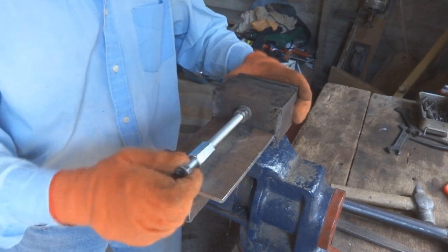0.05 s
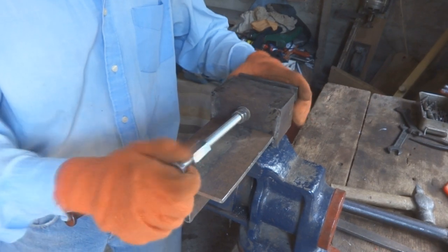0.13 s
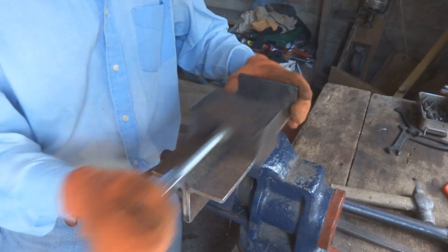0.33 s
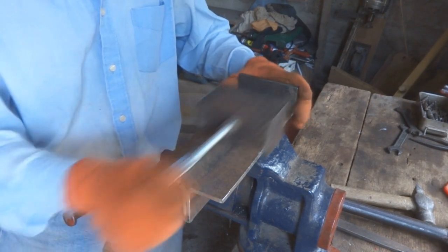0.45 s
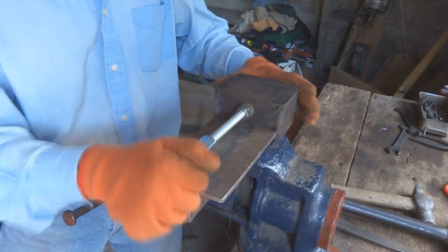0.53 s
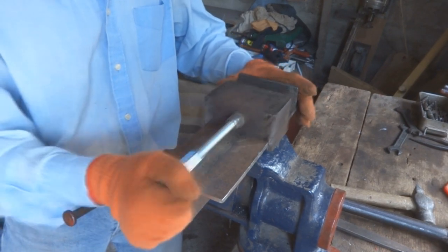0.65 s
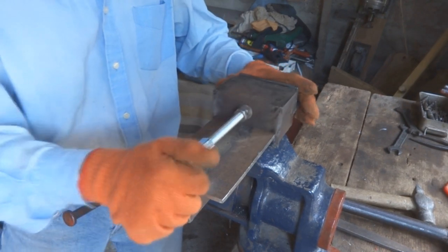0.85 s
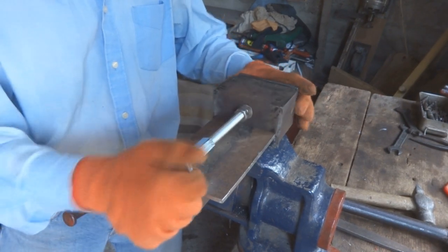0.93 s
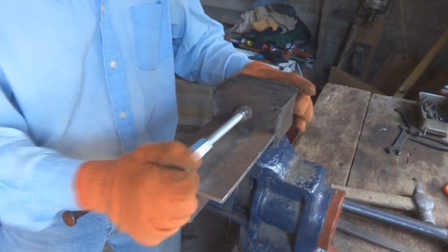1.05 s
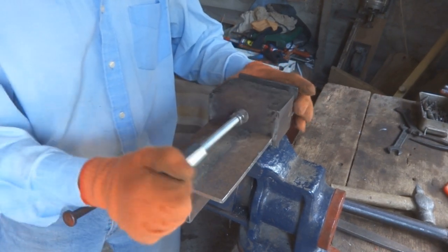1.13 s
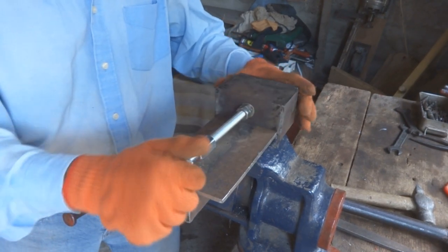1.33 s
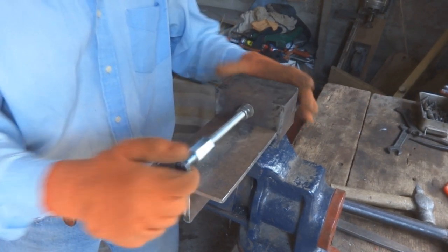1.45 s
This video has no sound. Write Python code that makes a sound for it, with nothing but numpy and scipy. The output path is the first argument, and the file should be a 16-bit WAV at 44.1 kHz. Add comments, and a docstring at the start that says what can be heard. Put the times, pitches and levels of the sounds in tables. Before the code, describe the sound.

A steel hand tool rasps and scrapes as it twists in a metal plate, with clicks.

```python
"""A steel hand tool twists to and fro in a hole in a steel plate, held in a bench vise in a small workshop.
Each twist is a rasp of tiny slips that rings the plate and the tool's shank. The loose tool clicks
in its holder, the bench thumps under the hardest twists, and now and then friction locks on to
one mode of the shank in a brief squeal."""
import sys
import numpy as np
from scipy import signal
from scipy.fft import rfft, irfft, next_fast_len
from scipy.io import wavfile

SR = 44100
rng = np.random.default_rng(int(sys.argv[2]) if len(sys.argv) > 2 else 0)


def transcribe(u):
    """Save the signal u as a 16-bit wav file named by the first command-line argument.

    u: samples, shape (n,) or (channels, n), limited to [-1, 1]; the rate is SR.
    q: integer samples, one column per channel.
    """
    v = np.clip(np.atleast_2d(u).T, -1, 1)
    q = np.round(v * 32767).astype(np.int16)
    wavfile.write(sys.argv[1], SR, q)


N = 66150
TIME_S = np.arange(N) / SR

# Table levels are relative.
# room noise spectrum: freq_hz, density_db
NOISE_SPECTRUM = [(30, -15), (100, -11), (200, 12.5), (500, 10), (1500, 0), (4000, 3), (8000, -6),
                  (15000, -15.5)]
# twists: full_force_s, attack_s, hold_s, level_db, bite_db, hiss_db, plate_db
TWISTS = [(0.018, 0.016, 0.05, -53, -11, 10.5, 1), (0.143, 0.1, 0.013, -61, 3.5, -9.5, -1),
          (0.2, 0.052, 0.012, -41, -2, 0.5, 3), (0.218, 0.028, 0.037, -34.5, -0.5, -5, 7),
          (0.256, 0.025, 0.051, -30.5, -4, -6, 6), (0.359, 0.026, 0.0083, -42, -8, 8, 8),
          (0.387, 0.063, 0.021, -29, 0.5, -7.5, 4.5), (0.425, 0.027, .022, -25, -1.5, -5.5, 3),
          (0.462, 0.0081, .03, -28, 2.5, 3.5, -1.5), (0.577, 0.098, 0.028, -31.5, -7, -0.5, 3.5),
          (0.68, 0.027, 0.018, -64, 10.5, 3, 1), (0.727, 0.048, .014, -38, 0, -3, 6),
          (0.744, 0.018, 0.012, -25.5, -5.5, -7.5, -0.5), (0.826, 0.045, 0.0087, -50.5, -7.5, 6.5, -5.5),
          (0.887, 0.048, 0.0073, -62, -6.5, -7.5, 8.5), (1.043, 0.11, 0.03, -40, -6, -10, 3),
          (1.076, 0.01, 0.025, -40, -12, -18.5, -6.5), (1.169, 0.053, 0.019, -35.5, -1, -10.5, 6),
          (1.188, 0.024, 0.027, -28, 2.5, -2.5, -4.5), (1.319, 0.05, 0.035, -73, -24, 17, 5.5)]
# rasp spectrum: freq_hz, density_db
RASP_SPECTRUM = [(30, -56.5), (80, -32.5), (135, -22.5), (190, -5), (310, -4.5), (500, 5.5), (700, 3),
                 (1100, 2.5), (1500, 2), (2050, -6), (2700, -3.5), (4000, -8.5), (5500, -14), (8000, -19),
                 (12000, -34.5), (15000, -36)]
# plate modes: pitch_hz
PLATE_HZ = [469, 612, 695, 748, 973, 1106, 1364, 1484, 1721, 1992, 2474, 2722, 2767, 3201, 3580, 3808]
# ring of each plate mode: level_db, t60_s
PLATE_MODES = [(11.5, 0.28), (22.1, 0.08), (16.2, 0.11), (2, 0.098), (17.2, .24), (4.5, 0.14), (18, .11),
               (16.24, 0.098), (14.8, 0.084), (7.9, 0.063), (13.5, 0.11), (8.75, 0.077), (9.2, 0.035),
               (12, 0.069), (8.8, 0.037), (5.96, 0.069)]
# shank modes: pitch_hz
SHANK_HZ = [3215, 3400, 3550, 4296, 4385, 6196, 6840, 7105, 7633, 8156, 8900, 9790, 10150, 11330, 13090,
            14015, 14290]
# ring of each shank mode: struck_db, t60_s, rubbed_db
SHANK_MODES = [(-13.5, 0.033, -16.5), (1, .06, -5.5), (0, 0.035, -14), (-11, 0.027, 5.5), (-5.5, .13, -8),
               (-28.5, 0.037, 3.5), (0.5, 0.13, 8), (-2, 0.16, 2), (-23, 0.19, -15), (-18.5, 0.13, -5),
               (-4.5, 0.066, -3), (-13, 0.31, -11.5), (-5, 0.029, -12), (-14, 0.24, -12.5), (-9.5, .11, -5),
               (1, 0.11, -11.5), (-5, 0.09, -14)]
# clicks of the loose tool: start_s, low_db, middle_db, top_db, crack_db, plate_db
CLICKS = [(0.012, -59.5, -71.5, -85, -76, -86), (0.079, -60, -64, -96, -55, -66),
          (0.117, -70, -81, -104, -45, -56), (0.3344, -52, -51.5, -67, -45, -68),
          (0.3835, -28.5, -51, -71, -35, -51), (0.5412, -32.5, -34.5, -48, -30, -50),
          (0.6594, -45.5, -50, -61.5, -65, -53), (0.9775, -54.5, -54.5, -52, -82, -90),
          (0.9832, -35.5, -40.5, -42, -34, -32), (1.0805, -46.5, -60, -84, -37, -34),
          (1.0905, -58, -47, -53, -64, -72), (1.0974, -46, -51.5, -63, -54, -56),
          (1.1864, -39, -39.5, -61, -27.5, -74), (1.3453, -65.5, -82, -86, -65, -74),
          (1.3568, -48, -62, -99, -59, -53)]
# low, middle and top bands of a click: freq_hz
CLICK_BANDS_HZ = [4000, 7000, 14000]
# spectrum of a click's crack: freq_hz, density_db
CRACK_SPECTRUM = [(40, -64), (300, -33.5), (1500, -12), (3400, 2), (5500, -4.5), (10000, -8), (15000, -7)]
# bench thumps: start_s, level_db
THUMPS = [(0.282, -76), (0.39, -68), (0.48, -63), (0.62, -72), (0.76, -75), (1.205, -61)]
# shank squeals: peak_s, level_db, swell_s, t60_s
SQUEALS = [(0.352, -55, .018, .06), (0.500, -36, 0.0099, 0.097), (0.552, -45, .008, 0.14),
           (0.563, -28.5, 0.023, .16), (0.557, -33.5, 0.01, 0.13)]
# mode of each squeal: pitch_hz
SQUEAL_HZ = [13150, 9790, 14760, 7106, 6831]

SLIPS_PER_S, SLIP_SPREAD_DB = 3500, 4.0
JUDDER_HZ, JUDDER_DB = 67.4, 1.5   # the edge catches and lets go
ATTACK_RISE_DB, RELEASE_DB_PER_S = 42, 502.5
BITE_HZ, HISS_HZ = 1956, 6950   # shelf centres
RASP_DB, PLATE_DB, BOOM_DB = 4, -2.5, -1.5
NOMINAL_BOUNCE_S, BOUNCE_LOSS_DB = 0.0023, 0.5
STRIKE_DB, KNOCK_DB, CRACK_DB = -5.5, -30.5, 2.5
ROOM_DB, SIDE_DB, BALANCE_DB = -19, -16, -1.0   # balance: left minus right
HALF_OCTAVE = np.sqrt(2)


def from_db(db):
    """Decibels to gain."""
    return 10 ** (np.asarray(db) / 20)


def colour(x, spectrum):
    """Minimum-phase filter through (freq_hz, gain_db) points."""
    size = next_fast_len(2 * N, real=True) // 2 * 2
    hz, db = np.transpose(spectrum)
    bins_hz = np.maximum(np.fft.rfftfreq(size, 1 / SR), 1)
    cepstrum = irfft(np.log(from_db(np.interp(np.log(bins_hz), np.log(hz), db))))
    cepstrum[1:size // 2] *= 2
    cepstrum[size // 2 + 1:] = 0
    return irfft(rfft(x, size) * np.exp(rfft(cepstrum)))[..., :N]


def butter(x, hz, kind, order=2):
    """Butterworth filter."""
    return signal.sosfilt(signal.butter(order, hz, kind, fs=SR, output="sos"), x)


def wander(hz):
    """Low-passed noise, rms 1."""
    slow = butter(rng.standard_normal(N), hz, "low")
    return slow / slow.std()


def decay(start_s, t60_s):
    """Sudden start, exponential fall."""
    return (TIME_S >= start_s) * from_db(-60 * np.maximum(TIME_S - start_s, 0) / t60_s)


def struck(x, hz, t60_s):
    """Mode that rings at height 1 after a unit impulse."""
    radius, angle = from_db(-60 / (t60_s * SR)), 2 * np.pi * hz / SR
    return signal.lfilter([.5, 0, -.5], [1, -2 * radius * np.cos(angle), radius * radius], x + 1e-18)


def rubbed(x, hz, t60_s):
    """Mode under steady drive, peak gain 1."""
    return (1 - from_db(-120 / (t60_s * SR))) * struck(x, hz, t60_s)


def taps(times_s, db):
    """One impulse at each time."""
    out = np.zeros(N)
    out[(times_s * SR).astype(int)] = from_db(db)
    return out


def reflections(x, delay_s, t60_s, cutoff_hz=5000):
    """Dense, dulled tail of echoes."""
    envelope = decay(delay_s, t60_s)
    tail = butter(rng.standard_normal(N) * envelope, cutoff_hz, "low", order=1)
    return signal.fftconvolve(x, tail / np.linalg.norm(envelope))[:N]


def room_noise(gain_db=-71.5):
    """Faint, steady background."""
    return from_db(gain_db) * colour(rng.standard_normal(N), NOISE_SPECTRUM)


def slips():
    """Dense run of tiny, uneven slips at the cutting edge, rms 1."""
    sizes = from_db(SLIP_SPREAD_DB * np.minimum(rng.exponential(1, N), 4)) * rng.choice([-1, 1], N)
    run = sizes * (rng.random(N) < SLIPS_PER_S / SR)
    return run / run.std()


def steel_sheen(x, count=70, low_hz=2300, high_hz=15000, t60_s=0.11, gain_db=9):
    """Adds the ring of many minor steel modes scattered over the treble."""
    places = (np.arange(count) + rng.random(count)) / count
    pitches_hz = low_hz * (high_hz / low_hz) ** places
    return x + from_db(gain_db) * sum((-1) ** k * rubbed(x, hz, t60_s) for k, hz in enumerate(pitches_hz))


def twist_rasp():
    """Each twist swells, holds and lets go; its slips rasp and ring the plate and the shank."""
    edge = slips() * from_db(JUDDER_DB * wander(JUDDER_HZ))
    across = edge * rng.choice([-1, 1], N)   # same slips, pushing across the plate
    friction, plate_drive = np.zeros(N), np.zeros(N)
    for full_force_s, attack_s, hold_s, level_db, bite_db, hiss_db, plate_db in TWISTS:
        attack_db = ATTACK_RISE_DB * np.maximum(full_force_s - TIME_S, 0) / attack_s
        release_db = RELEASE_DB_PER_S * np.maximum(TIME_S - full_force_s - hold_s, 0)
        force = from_db(level_db - attack_db - release_db)
        shelves = [(BITE_HZ / HALF_OCTAVE, 0), (BITE_HZ * HALF_OCTAVE, bite_db),
                   (HISS_HZ / HALF_OCTAVE, bite_db), (HISS_HZ * HALF_OCTAVE, bite_db + hiss_db)]
        drag, push = colour(force * np.array([edge, across]) * rng.choice([-1, 1], N), shelves)
        friction += drag
        plate_drive += from_db(plate_db) * push
    plate = sum((-1) ** k * from_db(db + PLATE_DB) * rubbed(plate_drive, hz, t60_s)
                for k, (hz, (db, t60_s)) in enumerate(zip(PLATE_HZ, PLATE_MODES)))
    shank = sum(from_db(rubbed_db) * rubbed(friction, hz, t60_s)
                for hz, (_, t60_s, rubbed_db) in zip(SHANK_HZ, SHANK_MODES))
    # low notes linger round the bench
    boom = reflections(butter(friction, [167, 454], "band"), delay_s=0.013, t60_s=0.24)
    rasp = steel_sheen(colour(friction, RASP_SPECTRUM))
    return from_db(RASP_DB) * rasp + butter(plate + shank, 210, "high") + from_db(BOOM_DB) * boom


def holder_clicks():
    """The tool bounces in its holder: four touches on the shank, a softened plate knock, a crack."""
    starts_s, low_db, middle_db, top_db, cracks_db, plate_db = np.transpose(CLICKS)
    bands_db = np.transpose([low_db, middle_db, top_db])
    touches_s = [starts_s + NOMINAL_BOUNCE_S * k * rng.uniform(0.76, 1.8, len(CLICKS)) for k in range(4)]
    shank, cracks = np.zeros(N), np.zeros(N)
    for hz, (struck_db, t60_s, _) in zip(SHANK_HZ, SHANK_MODES):
        hit_db = np.array([np.interp(hz, CLICK_BANDS_HZ, row) for row in bands_db]) + struck_db + STRIKE_DB
        hits = sum(taps(at_s, hit_db - BOUNCE_LOSS_DB * k) for k, at_s in enumerate(touches_s))
        shank += struck(hits, hz, t60_s)
    knock = sum((-1) ** k * struck(taps(starts_s, plate_db + db + KNOCK_DB), hz, t60_s)
                for k, (hz, (db, t60_s)) in enumerate(zip(PLATE_HZ, PLATE_MODES)))
    grit = slips()
    for start_s, crack_db, row in zip(starts_s, cracks_db, bands_db):
        ring_tilt = list(zip(CLICK_BANDS_HZ, row - row[0]))
        cracks += from_db(crack_db + CRACK_DB) * colour(grit * decay(start_s, t60_s=0.041), ring_tilt)
    return shank + butter(knock, [450, 900], "band") + steel_sheen(colour(cracks, CRACK_SPECTRUM))


def bench_thumps(centre_hz=91, t60_s=0.34):
    """The bench gives under the vise: dull bursts of rumble."""
    rumble = butter(rng.standard_normal(N), [centre_hz / HALF_OCTAVE, centre_hz * HALF_OCTAVE], "band")
    blows = sum(from_db(level_db) * decay(start_s, t60_s) for start_s, level_db in THUMPS)
    return butter(blows, centre_hz / 2, "low") * rumble / rumble.std()


def shank_squeals():
    """Friction locks on to one shank mode, which swells and rings out."""
    out = np.zeros(N)
    for hz, (peak_s, level_db, swell_s, t60_s) in zip(SQUEAL_HZ, SQUEALS):
        rise = np.clip((TIME_S - peak_s) / swell_s + 1, 0, 1)
        envelope = np.where(TIME_S < peak_s, rise, decay(peak_s, t60_s))
        out += from_db(level_db) * envelope * np.sin(2 * np.pi * hz * TIME_S)
    return out


def scene():
    """Tool, plate and bench, close and nearly central in a quiet room; stereo."""
    direct = twist_rasp() + holder_clicks() + bench_thumps() + shank_squeals()
    room = np.array([reflections(direct, delay_s=0.006, t60_s=0.42) for _ in range(2)])
    mid = direct + room_noise()
    # near reflections off the bench
    side = from_db(SIDE_DB) * reflections(butter(mid, 700, "high", order=1), delay_s=0.0004, t60_s=0.027)
    left = (mid + side) * from_db(BALANCE_DB / 2)
    right = (mid - side) * from_db(-BALANCE_DB / 2)
    return np.array([left, right]) + from_db(ROOM_DB) * room


def record(dry):
    """Steep low-pass at 15.8 kHz."""
    return signal.sosfilt(signal.ellip(10, .1, 80, 15800, fs=SR, output="sos"), dry)


dry = scene()
out = record(dry)
transcribe(out)
```